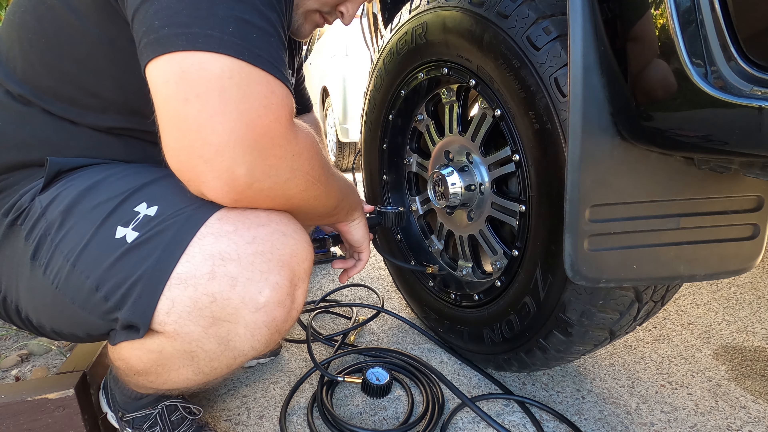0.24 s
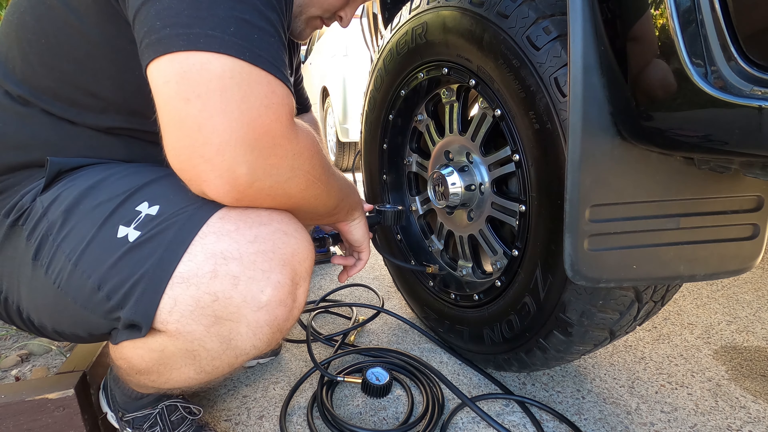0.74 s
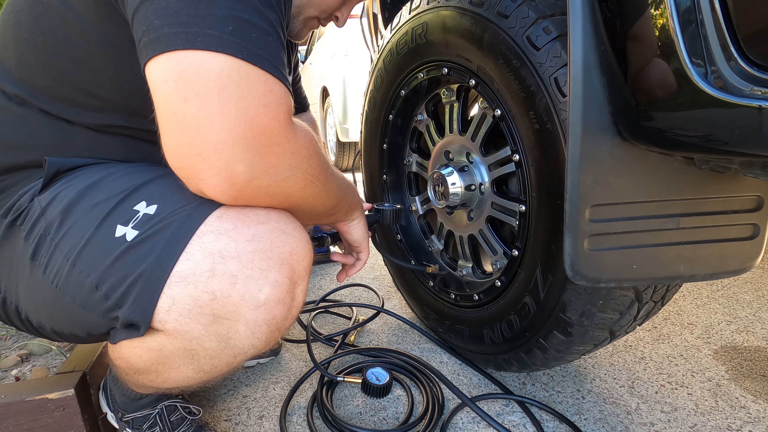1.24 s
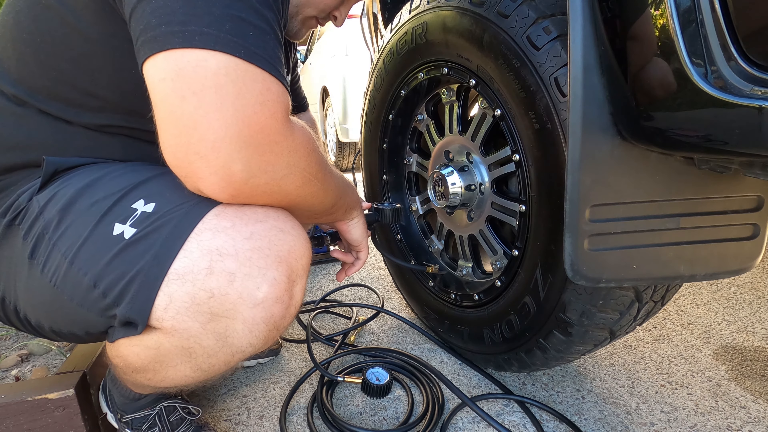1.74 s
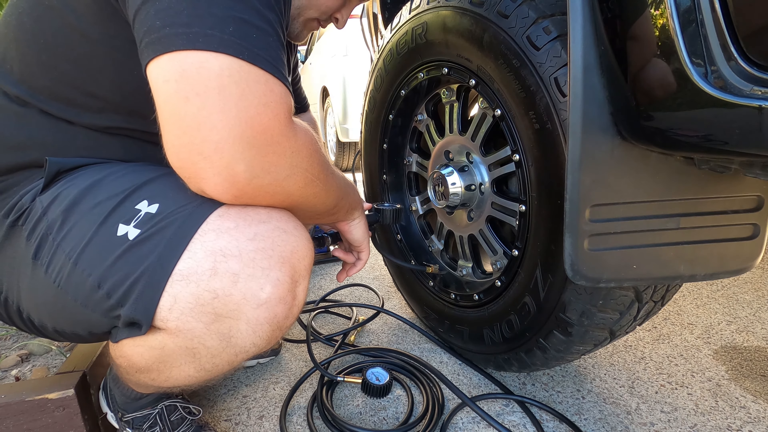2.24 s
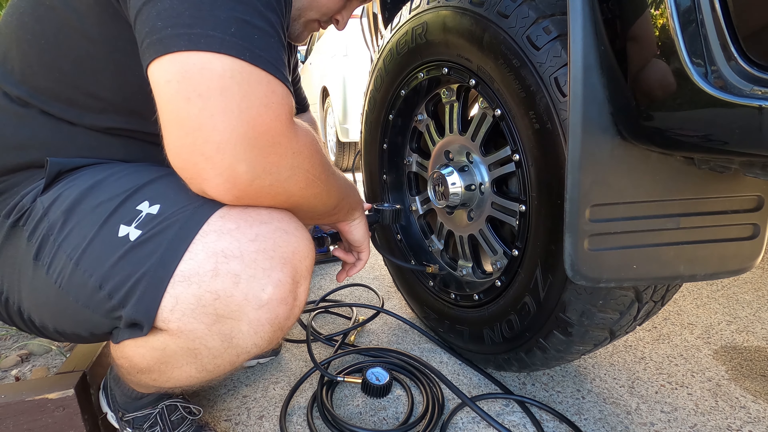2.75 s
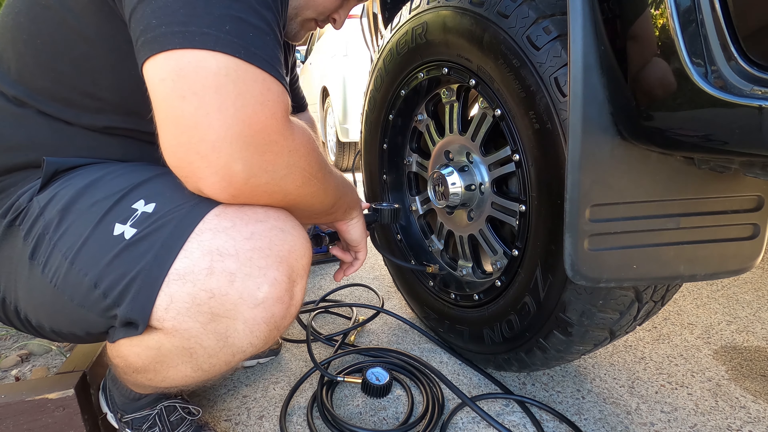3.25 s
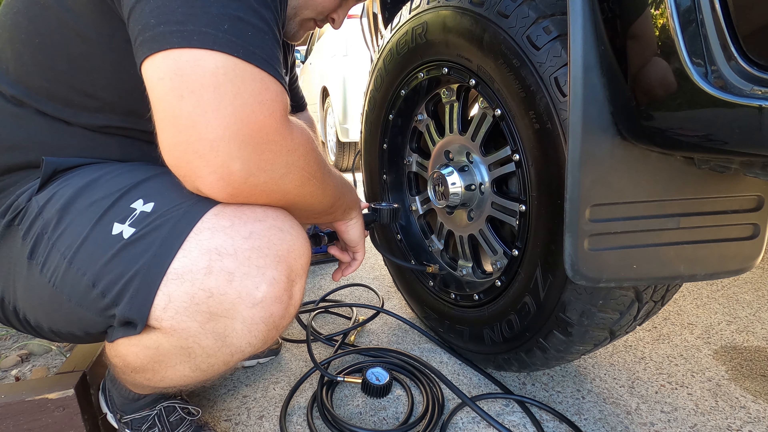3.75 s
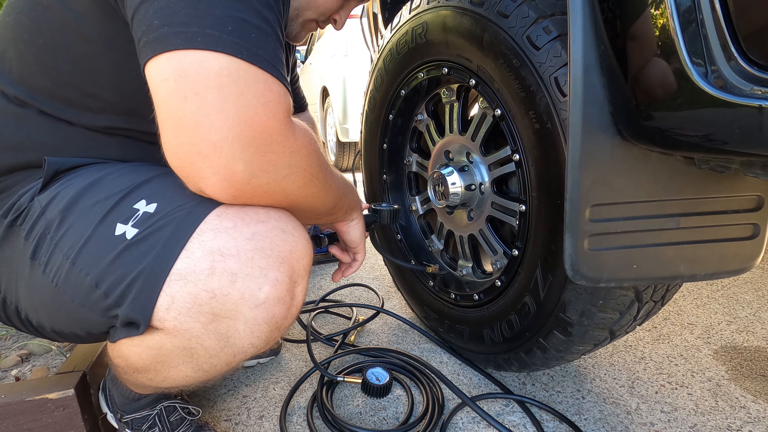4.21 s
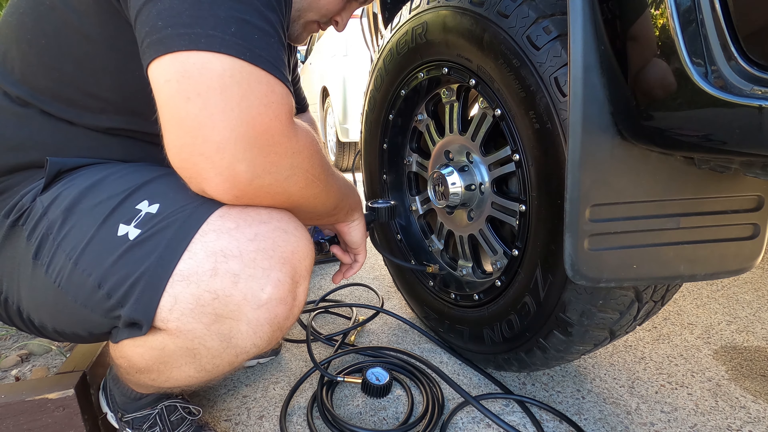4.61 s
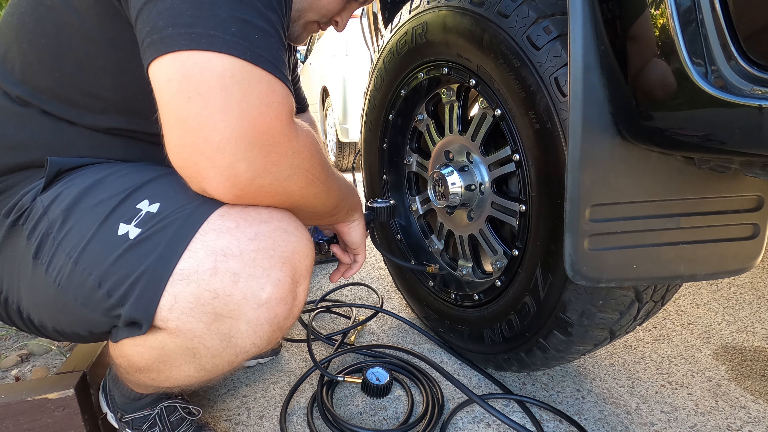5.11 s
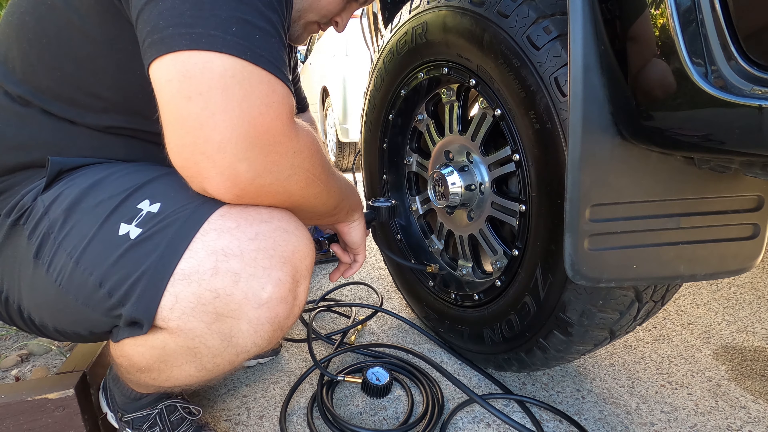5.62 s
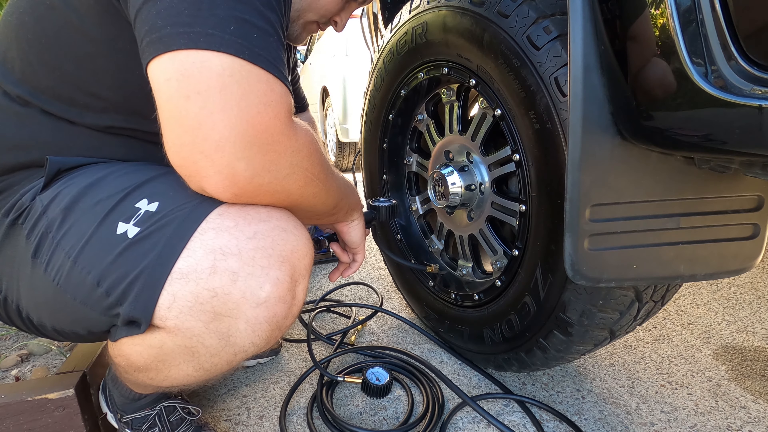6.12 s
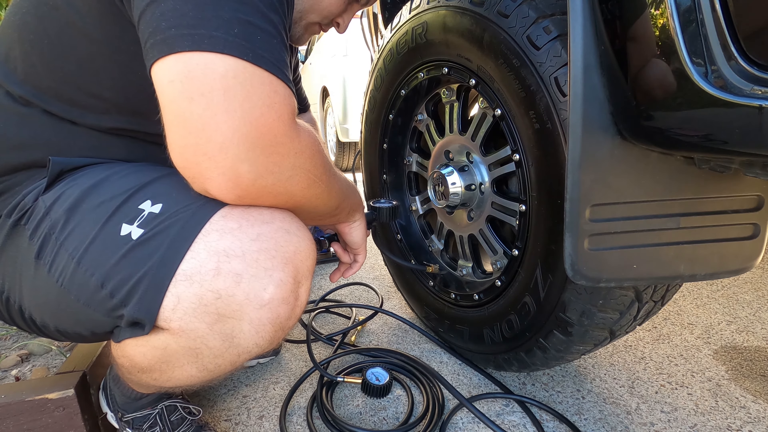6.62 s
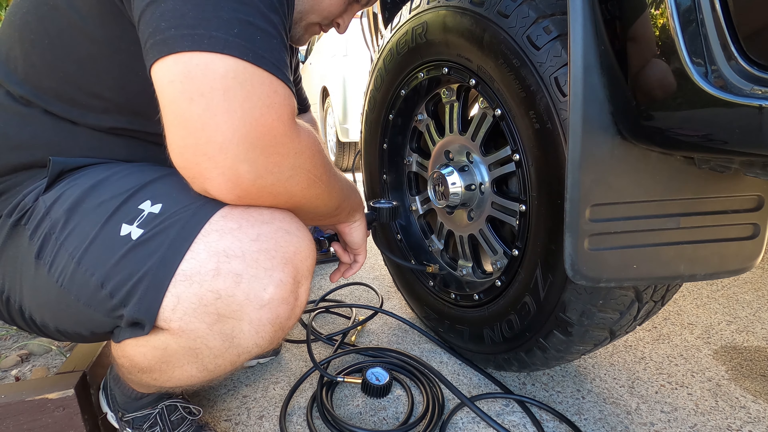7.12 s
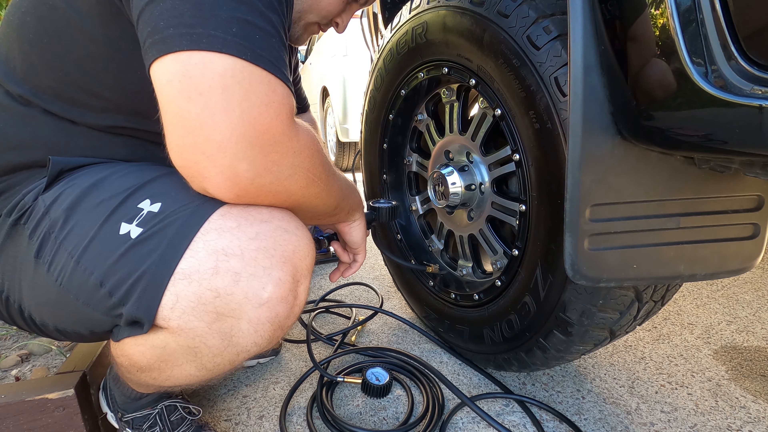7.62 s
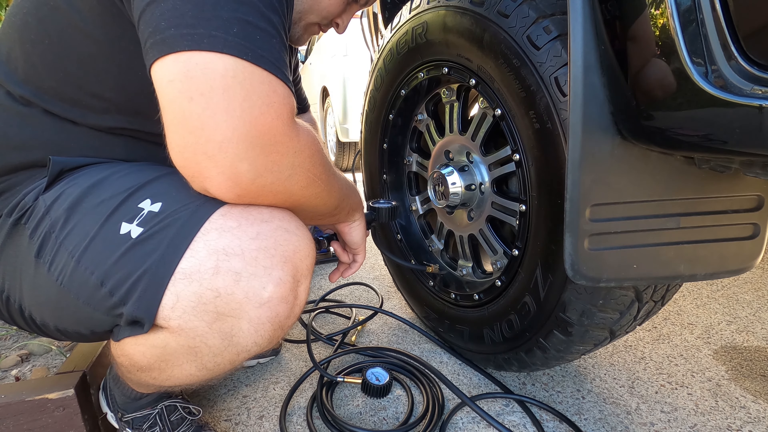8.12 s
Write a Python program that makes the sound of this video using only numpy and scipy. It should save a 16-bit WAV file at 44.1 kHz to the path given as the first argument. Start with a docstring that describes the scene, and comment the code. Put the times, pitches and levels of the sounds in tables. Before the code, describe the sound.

Loud, rattling tyre pump buzzes at a steady low pitch, speeds up, cuts out briefly to reveal a clattering engine idle, then kicks back in.

```python
"""A hard, fast hammering close to the microphone: a small piston compressor fills a tyre on a driveway.
Each crank turn sets off a ringing knock and puff, with air hiss, valve rattle and gear whine around them.
The pump races as its load eases, stops with a few hoots, and starts again.
Beside it an engine idles, built from exhaust harmonics, clatter bursts, ticks and steady hiss;
the gain control of a phone brings up its clatter during the pause."""
import sys
import numpy as np
from scipy import signal
from scipy.fft import rfft, irfft
from scipy.io import wavfile
from scipy.ndimage import map_coordinates

SR = 44100
rng = np.random.default_rng(int(sys.argv[2]) if len(sys.argv) > 2 else 0)


def dump_mix(stems):
    """Bounce the given channels to the path in sys.argv[1] as a 16-bit WAV at rate SR."""
    frames = np.atleast_2d(stems).T  # one column per channel
    limited = np.clip(frames, -1, 1)  # hard clip at full scale
    pcm = np.round(limited * 32767).astype(np.int16)
    wavfile.write(sys.argv[1], SR, pcm)


N = 368662
TIME = np.arange(N) / SR  # s
RATED_HZ = 53  # crank turns per second for which the stroke tones are given
IDLE_HZ = 24.97  # firings per second of the idling engine while the pump runs at full pace
# the pump starts to race, the motor is cut, the motor is switched on again (s)
RELEASE_S, OFF_S, ON_S = 4.48, 5.66, 6.5


def undb(db):
    """Decibels to gain."""
    return 10 ** (np.asarray(db) / 20)


def fade(start_s, time_s):
    """One until the start, then an exponential decay."""
    return np.exp(-np.maximum(TIME - start_s, 0) / time_s)


def colour(x, table, axis=1):
    """Give white sound of unit power the spectrum of a table of (frequency [Hz], level [dB per Hz])."""
    rows = np.array(table, float)
    hz = np.maximum(np.fft.rfftfreq(N, 1 / SR), 1)
    db = np.interp(np.log(hz), np.log(rows[:, 0]), rows[:, axis])
    return irfft(rfft(x) * undb(db), N) * np.sqrt(SR / 2)


def resonate(x, hz, width_hz):
    """One resonance, with gain 1 at its centre."""
    return signal.lfilter(*signal.iirpeak(hz, hz / width_hz, fs=SR), x)


def resonant_grit(hz, width_hz):
    """Noise through the same resonance twice, brought to unit power."""
    noise = rng.standard_normal(N)
    grit = resonate(resonate(noise, hz, width_hz), hz, width_hz)
    return grit / np.std(grit)


def harmonics(turns, table):
    """Steady tones locked to a rotation, from (multiple of its rate, level [dB])."""
    out = 0
    for multiple, db in table:
        phase = 2 * np.pi * (round(multiple) * turns + rng.random())
        out = out + undb(db) * np.sqrt(2) * np.sin(phase)
    return out


def burst(turns, rise, fall):
    """A swell of unit power once a turn; rise and fall are shares of the turn."""
    place = turns % 1
    shape = (1 - np.exp(-place / rise)) * np.exp(-place / fall)
    return shape / np.sqrt(np.mean(shape ** 2))


def repeating(turns, hz):
    """Rough contact that comes back alike on every turn of a shaft running near hz."""
    size = int(SR / hz)
    spectrum = np.exp(2j * np.pi * rng.random(size // 2))
    track = irfft(spectrum, 8 * size) * 8 * np.sqrt(size)  # 8 points per sample
    return np.interp(turns % 1, np.arange(len(track)) / len(track), track)


def intake():
    """Steady hiss of the engine's intake and belts: shaped noise."""
    # spectrum of the hiss: (frequency [Hz], level [dB per Hz])
    hiss_spectrum = [(500, -105), (1550, -68.5), (2600, -77.5), (3400, -69.5), (4000, -86.5), (5600, -83.5),
                     (6800, -84.5), (8500, -99), (9500, -90), (14000, -122)]
    return colour(rng.standard_normal(N), hiss_spectrum)


def ticks(firings):
    """Each cylinder's injector adds its own crisp tick once a cycle: resonant noise in a short swell."""
    # one row a cylinder: (place in the cycle [firings], centre [Hz], width of each resonance [Hz],
    # level at the peak before scatter and treble cut [dB])
    injectors = [(.29, 2250, 2240, -32.5), (1.17, 4500, 3050, -39), (2.25, 3530, 2800, -42),
                 (3.27, 3300, 2800, -49)]
    length_s, scatter_db, dull_hz = 0.008, 1.5, 7500
    out = 0
    for place, hz, width_hz, db in injectors:
        cycles = (firings - place) / len(injectors) + .5
        away_s = (cycles % 1 - .5) * len(injectors) / IDLE_HZ
        scatter = scatter_db * rng.standard_normal(int(cycles[-1]) + 1)
        sizes = undb(db + scatter)[cycles.astype(int)]
        out = out + sizes * np.exp(-(away_s / length_s) ** 2) * resonant_grit(hz, width_hz)
    return signal.sosfilt(signal.butter(4, dull_hz, fs=SR, output="sos"), out)


def engine(pump_pace):
    """Each firing gives a burst of clatter, partly alike from cycle to cycle, over the exhaust hum."""
    # exhaust hum: (multiple of the firing rate, level [dB])
    exhaust = [(1, -61), (2, -54), (3, -49.5), (4, -37), (5, -53.5), (6, -49), (7, -53), (8, -38),
               (9, -54.5), (10, -49)]
    # combustion clatter: (frequency [Hz], level [dB per Hz])
    combustion = [(30, -99), (150, -72.5), (350, -58.5), (630, -54.5), (800, -63.5), (910, -53.5),
                  (1000, -69), (1110, -55), (1270, -65.5), (2300, -69.5), (3500, -74), (4000, -76.5),
                  (4700, -76.5), (5600, -92), (6800, -86), (8500, -95.5), (11000, -102), (14000, -120)]
    idle_rise_hz = .145  # while the pump draws no current
    repeat, steady = 0.33, 0.41  # shares of the power alike each cycle, and even between firings
    scatter_db = 1.5  # from firing to firing

    firings = np.cumsum(IDLE_HZ + idle_rise_hz * (1 - pump_pace)) / SR + .16
    hum = harmonics(firings, exhaust)
    # the repeating part spans two firings
    alike = repeating(firings / 2, IDLE_HZ / 2)
    grit = np.sqrt(repeat) * alike + np.sqrt(1 - repeat) * rng.standard_normal(N)
    sizes = undb(scatter_db * rng.standard_normal(int(firings[-1]) + 1))[firings.astype(int)]
    swell = np.sqrt(steady + (1 - steady) * (sizes * burst(firings - .13, 0.34, 0.22)) ** 2)
    return hum + colour(grit * swell, combustion) + ticks(firings)


def drive():
    """Crank speed (Hz), ease of load, slack to refill and strain as the pump works, races, coasts, restarts."""
    # under load the crank slows a little as the tyre fills
    loaded_hz, sag_hz_per_s = 53.02, .025
    # relieved of its load it gains speed: most it can gain, time constant, lag of the rotor
    race_hz, race_s, inertia_s = 13.55, 1.05, .06
    coast_s = .19  # once cut, friction stops it evenly
    # restart: a quick spin-up to just under the final speed, then a slow creep over the rest
    restart_hz, spin_up_s, creep_hz, creep_s = 52.81, .046, 1.235, .7
    # the load falls away faster than the speed rises; ease heads for relief but is held at 1
    relief, relief_s = 1.08, 0.5
    # at the restart the hose stays slack for a moment, then pressure builds again
    slack_s, refill_s = 0.25, 0.58
    # strain on the mounts grows as the crank stalls, jumps at the restart and settles
    stall_strain, start_strain, settle_s = 0.79, 1, 0.064

    lagging = race_s * fade(RELEASE_S, race_s) - inertia_s * fade(RELEASE_S, inertia_s)
    gained_hz = race_hz * (1 - lagging / (race_s - inertia_s))
    coast = np.clip(1 - (TIME - OFF_S) / coast_s, 0, 1)
    first_hz = (loaded_hz - sag_hz_per_s * TIME + gained_hz) * coast
    second_hz = (restart_hz - creep_hz * fade(ON_S, creep_s)) * (1 - fade(ON_S, spin_up_s))

    restarted = TIME >= ON_S
    ease = np.clip(relief * (1 - fade(RELEASE_S, relief_s)) * coast, 0, 1)
    refill = restarted * fade(ON_S + slack_s, refill_s)
    strain = np.where(restarted, start_strain * fade(ON_S, settle_s), stall_strain * (1 - coast))
    return first_hz + second_hz, ease, refill, strain


def rasp():
    """A brief rasp as the load lets go: resonant noise under one smooth swell."""
    half_s, peak_db = 0.057, -25
    swell = np.exp(-((TIME - RELEASE_S - half_s) / half_s) ** 2)
    return undb(peak_db) * swell * resonant_grit(1730, width_hz=1100)


def gulps():
    """The intake hoots, gliding upwards, on each slow, heavy stroke."""
    # strokes heard one by one as the crank stalls, rocks back and starts:
    # (time [s], pitch at that time [Hz], peak level [dB])
    slow_strokes = [(5.731, 462, -16), (5.755, 525, -11), (5.797, 550, -12.5), (5.833, 473, -20),
                    (6.518, 465, -18), (6.540, 555, -9), (6.568, 517, -14), (6.592, 520, -12),
                    (6.614, 503, -21)]
    glide_hz_per_s, half_s = 8400, 0.0069
    out = 0
    for time_s, hz, db in slow_strokes:
        t = TIME - time_s
        tone = np.sin(2 * np.pi * (hz + glide_hz_per_s * t / 2) * t)
        out = out + undb(db) * np.exp(-(t / half_s) ** 2) * tone
    return out


def labour(turns, hz, strain, valves):
    """Motor groan and gear tone slide with the crank; the gears growl under torque as the speed changes."""
    # growl of the gears under torque: (frequency [Hz], level [dB per Hz])
    gear_growl = [(80, -85), (300, -53), (750, -57), (1000, -53), (1550, -54), (2300, -71), (8000, -100)]
    motor_order, mesh_order = 8, 20  # cycles per crank turn
    motor_db, mesh_db, mesh_hz_per_s = -13, -11, 51
    torque = np.tanh(np.abs(np.gradient(hz)) * SR / mesh_hz_per_s)
    mesh = torque * np.sin(2 * np.pi * mesh_order * turns)
    gearbox = undb(mesh_db) * resonate(mesh, 995, width_hz=53)
    growl = torque * colour(valves * rng.standard_normal(N), gear_growl)
    groan = undb(motor_db) * strain * np.sin(2 * np.pi * motor_order * turns)
    return gearbox + growl - groan


def pops(turns):
    """The valves pop twice a turn as pressure pulses; the small pump radiates little bass."""
    # valve openings: (place [turns], half-width [turns], peak level before the low cut [dB])
    openings = [(.86, 0.024, -2), (0.351, 0.047, -7)]
    pulses = 0
    for place, width, db in openings:
        away = (turns - place + .5) % 1 - .5
        pulses = pulses + undb(db) * np.exp(-(away / width) ** 2)
    return signal.sosfilt(signal.butter(3, 160, "high", fs=SR, output="sos"), pulses)


def housing(contact, state):
    """Fixed resonances of the pump housing pick out each harmonic of the rattle that glides through them."""
    # resonances: (centre [Hz], width [Hz], then level [dB per Hz] when
    # refilling, slightly eased, mostly eased, running light)
    housing_modes = [(1067, 185, -70, -39.5, -45, -48), (1539, 100, -49.5, -49, -49, -54),
                     (1736, 58, -57, -56, -55, -64), (1855, 140, -55, -65, -65, -64),
                     (2025, 240, -61, -82, -62, -46), (2210, 66, -54, -67, -69, -53),
                     (2480, 75, -75, -73, -68, -53), (2664, 124, -61, -50, -64, -51.5),
                     (2730, 53, -75, -58, -59, -77)]
    stages = [-.7, 0, .25, .72, 1]
    out = 0
    for hz, width_hz, refilling_db, *eased_db in housing_modes:
        gains = np.r_[undb(refilling_db), 0, undb(eased_db)]  # silent at full load
        ringing = resonate(resonate(contact, hz, width_hz), hz, width_hz)
        out = out + np.interp(state, stages, gains) * ringing
    return out * np.sqrt(SR / 2)


def rings(split_hz, side, size=8192, count=17, order=32):
    """Decaying pump responses below (side > 0) or above (side < 0) a split, from refilling to light."""
    # tone of a stroke, rows refilling the hose, full load, half load, running light:
    # (level of crank order 1 [dB], of order 2 [dB], and so on)
    stroke_tone = [
        [-45, -25, -34, -24, -25.5, -29.5, -35, -17, -26, -19.5, -25, -28, -26, -36, -53, -28, -46, -26.5, -27,
         -16.5, -27.5, -31, -32, -44, -33, -37, -35, -39, -45, -30],
        [-47.5, -26, -36, -24.5, -27, -24.5, -37.5, -23.5, -27.5, -19, -24, -28, -39.5, -35.5, -41.5, -25.5,
         -57, -24, -34, -17, -27.5, -26.5, -33, -31.5, -29.5, -40, -37, -28.5, -39.5, -48.5],
        [-55, -24, -33, -22.5, -32, -25, -20.5, -16.5, -38, -24.5, -31, -21.5, -28, -55, -32, -39, -28, -35,
         -31, -25, -35, -47, -44, -41, -37, -39, -39, -41, -35, -39],
        [-75, -44, -31.5, -34.5, -43, -44, -28.5, -34.5, -28, -24, -42, -29, -53, -50, -41, -47, -23.5, -40,
         -36, -52, -48, -40, -48, -34, -35, -38, -41, -39, -37, -46],
    ]
    # the puff hoots upwards and its bass arrives late: (frequency [Hz], delay [s])
    spread = [(100, 0.01113), (250, 0.00956), (380, 0.00022), (620, 0.0034), (800, 0.00345),
              (1440, 0.00025)]
    hz = np.maximum(np.fft.rfftfreq(size, 1 / SR), 1)
    stages = [-1, 0, .5, 1]
    states = np.linspace(-1, 1, count)
    levels = np.transpose([np.interp(states, stages, dbs) for dbs in np.transpose(stroke_tone)])
    tones = [np.interp(hz / RATED_HZ, 1 + np.arange(len(row)), row) for row in levels]
    gain = undb(tones) * SR / RATED_HZ / np.sqrt(2)
    band = 1 / np.sqrt((1 + (hz / split_hz) ** (side * order)) * (1 + (hz / 1560) ** (2 * order)))
    # minimum phase: fold the cepstrum so that each ring starts at once and decays
    cepstrum = irfft(np.log(gain * (band + 1e-4)))
    cepstrum[:, 1:size // 2] *= 2
    cepstrum[:, size // 2 + 1:] = 0
    # summing the delay over frequency gives the phase that disperses the ring
    delay_s = np.interp(hz, *np.transpose(spread))
    lag = np.exp(-2j * np.pi * np.cumsum(delay_s) * SR / size)
    return irfft(np.exp(rfft(cepstrum)) * lag)[:, :size // 2]


def strike(responses, turns, hz, state, scatter_db, count=4):
    """Start a ring at each whole turn; the last few overlap, and keep their pitch when the crank slows."""
    # ring time in samples, sped up with a racing crank but hardly slowed with a stalling one
    clock = np.cumsum(np.maximum(hz, RATED_HZ - 1)) / RATED_HZ
    starts = np.interp(np.arange(np.ceil(turns[0]), turns[-1]), turns, clock)
    earlier = starts[0] - np.arange(count, 0, -1) * SR / RATED_HZ
    starts = np.r_[earlier, starts]
    sizes = undb(scatter_db * rng.standard_normal(len(starts)))
    last = np.searchsorted(starts, clock) - 1
    row = (state + 1) / 2 * (len(responses) - 1)
    out = 0
    for k in range(count):
        age = clock - starts[last - k]
        out = out + sizes[last - k] * map_coordinates(responses, [row, age], order=1)
    return out


def compressor(hz, pace, ease, refill, strain):
    """The piston knocks, a puff of air follows, the gears whine and the valves chatter twice a turn."""
    # rattle of valves and gears:
    # (frequency [Hz], level at full load [dB per Hz], level running light [dB per Hz])
    valve_rattle = [(704, -111, -70), (1350, -55, -54), (1660, -63, -51.5), (1900, -59.5, -61),
                    (2080, -63, -53.5), (2253, -58.5, -52), (2365, -59.5, -70), (2700, -64, -60),
                    (3080, -72.5, -64.5), (3760, -72.5, -68), (4160, -71, -69), (5340, -79.5, -76),
                    (6070, -79, -75.5), (8040, -89.5, -88), (14000, -120, -120)]
    # air rushing through the pump: (frequency [Hz], level [dB per Hz])
    air_rush = [(30, -89), (100, -62.5), (400, -60.5), (800, -64), (1070, -62.5), (1400, -76),
                (2700, -73.5), (4500, -82.5), (6800, -82.5), (8700, -89.5), (9300, -81.5), (11000, -90),
                (12500, -105), (14000, -116)]
    # whine of motor and gears under load: (crank order, level [dB])
    gear_whine = [(32, -34.5), (39, -38), (42, -45), (45, -45), (48, -38.5), (50, -35.5), (52, -40.5),
                  (53, -40.5), (54, -50), (59, -52), (63, -48.5), (67, -69), (72, -45.5), (81, -60)]
    # force at full load, and its change when running light and under full strain
    force_db, light_db, strain_db = -1.25, 0.5, -7
    loose, loose_light = 0.04, 0.067  # random share of the rattle's power, and its growth off full load
    whine_kept = 0.66  # share of the whine left once the load lets go

    turns = .2 + np.cumsum(hz) / SR
    state = ease - refill  # -1 refilling, 0 full load, 1 running light
    split_hz = 720  # puff below, knock above
    knock = strike(rings(split_hz, -0.91), turns + 0.0586, hz, state, scatter_db=0) * pace
    puff = strike(rings(split_hz, 0.81), turns - .24, hz, state, scatter_db=-0.25) * (1 - 0.55 * strain)

    first_swell = burst(turns + 0.065, 0.043, 0.097)
    second_swell = burst(turns - .45, 0.046, 0.84)
    valves = np.sqrt(0.84 + 0.4 * first_swell ** 2 + 0.069 * second_swell ** 2)
    # without pressure to hold them, the parts rattle less alike from turn to turn
    chance = loose + loose_light * np.sqrt(np.abs(state))
    alike = np.sqrt(1 - chance) * repeating(turns, RATED_HZ)
    contact = valves * (alike + np.sqrt(chance) * rng.standard_normal(N))
    loaded_rattle = (1 - ease) * colour(contact, valve_rattle)
    light_rattle = ease * colour(contact, valve_rattle, axis=2)
    rattle = loaded_rattle + light_rattle + housing(contact, state)

    whine_level = whine_kept + (1 - whine_kept) * fade(RELEASE_S, 0.078)
    whine = harmonics(turns, gear_whine) * whine_level * (1 - refill)
    rush = colour(valves ** 0.93 * rng.standard_normal(N), air_rush)
    air = rush * undb(2.3 * ease + 2.0 * strain) + pops(turns) * ease ** 0.93
    effort = labour(turns, hz, np.sqrt(strain) * pace, valves)
    running = puff + knock + (rattle + whine) * pace ** 1.75 + (air + effort) * pace
    return running * undb(force_db + light_db * ease + strain_db * strain) + gulps() + rasp()


def scene():
    """Pump and engine, close by in the open air."""
    hz, ease, refill, strain = drive()
    pace = np.minimum(hz / RATED_HZ, 1)
    background = intake() + engine(pace)
    return (background + compressor(hz, pace, ease, refill, strain))[None]


def record(dry):
    """Gain control follows the power at the microphone and lifts quiet stretches; the top is cut."""
    target_db, lift_db = -16.0, 4.0  # level left unchanged, most lift
    slope, follow_s, top_hz = 0.77, 0.033, 14500  # slope in dB of gain per dB of level
    keep = np.exp(-1 / (follow_s * SR))
    power = signal.lfilter([1 - keep], [1, -keep], dry[0] ** 2, zi=[np.mean(dry ** 2)])[0]
    gain_db = np.minimum(slope * (target_db - 10 * np.log10(power)), lift_db)
    top_cut = signal.ellip(8, .2, 70, top_hz, fs=SR, output="sos")
    return signal.sosfilt(top_cut, dry * undb(gain_db))


dry = scene()
out = record(dry)
dump_mix(out)
```